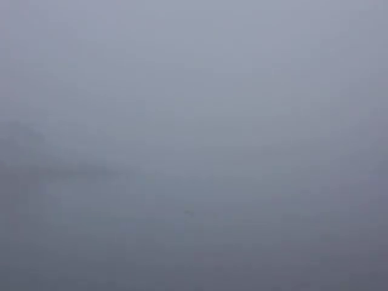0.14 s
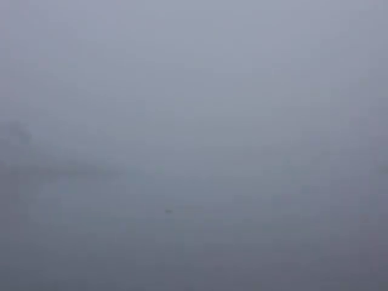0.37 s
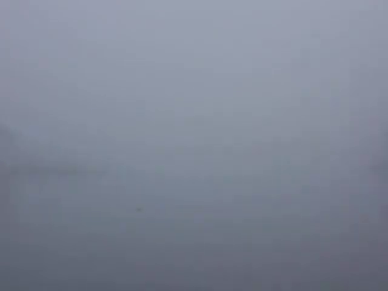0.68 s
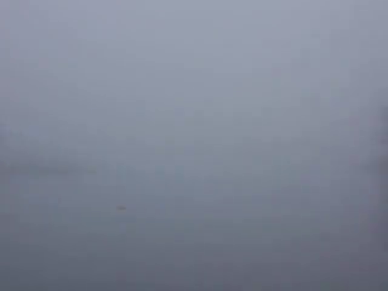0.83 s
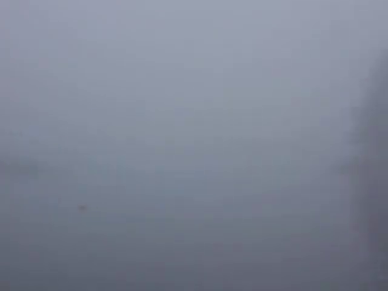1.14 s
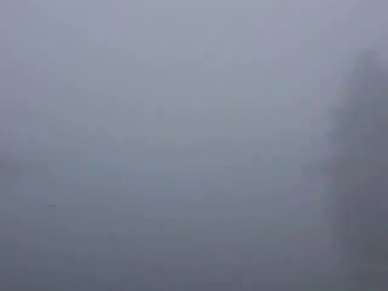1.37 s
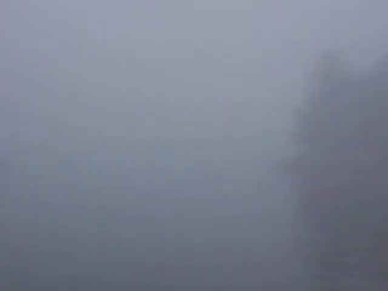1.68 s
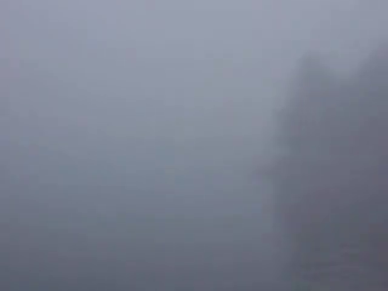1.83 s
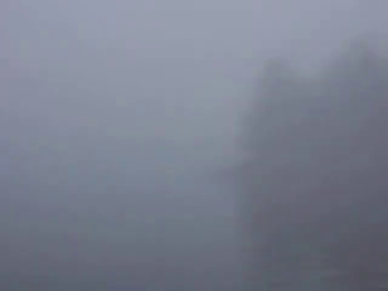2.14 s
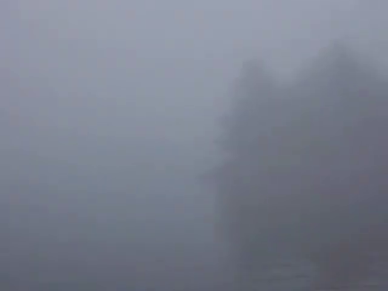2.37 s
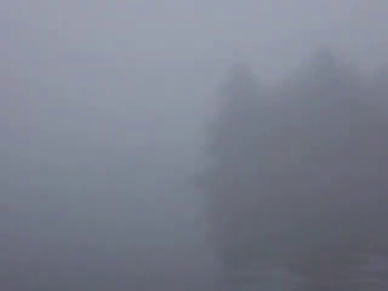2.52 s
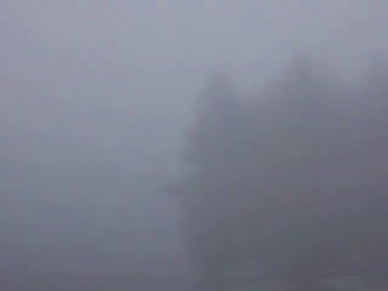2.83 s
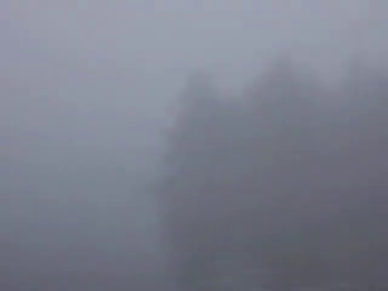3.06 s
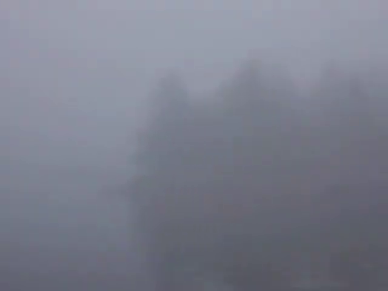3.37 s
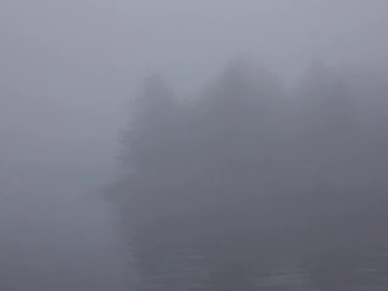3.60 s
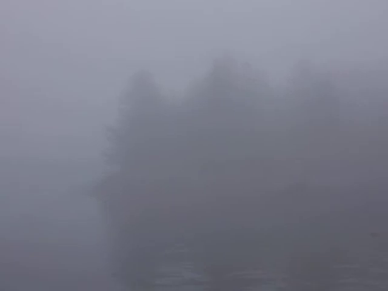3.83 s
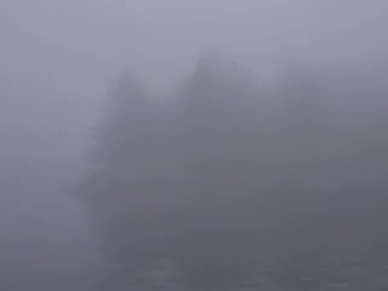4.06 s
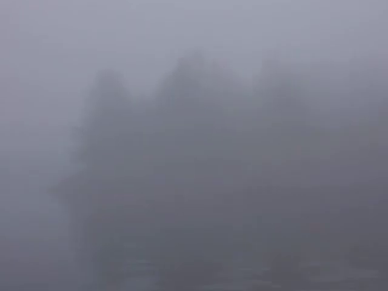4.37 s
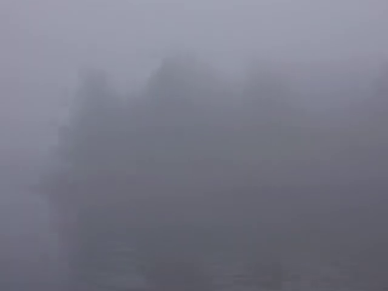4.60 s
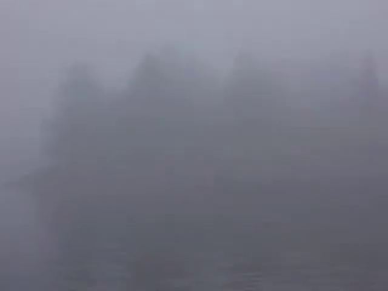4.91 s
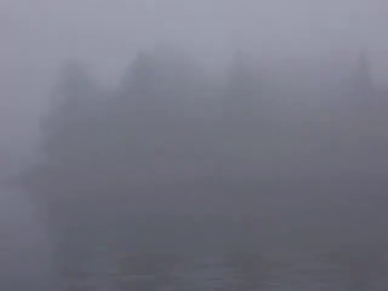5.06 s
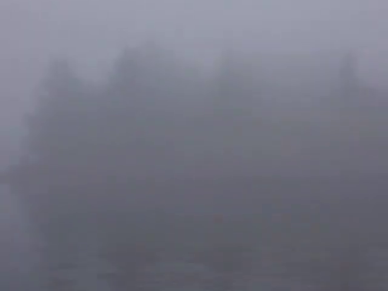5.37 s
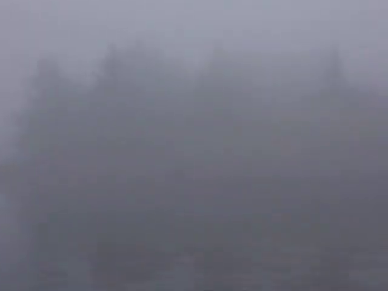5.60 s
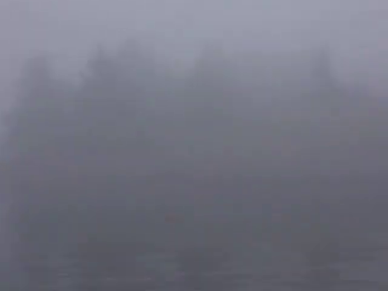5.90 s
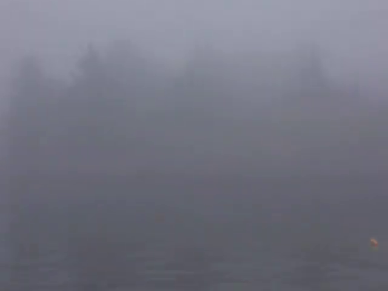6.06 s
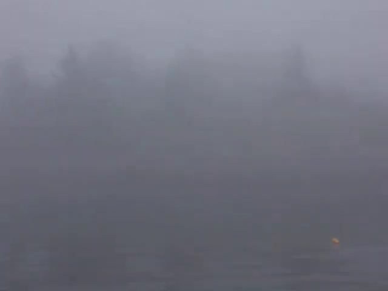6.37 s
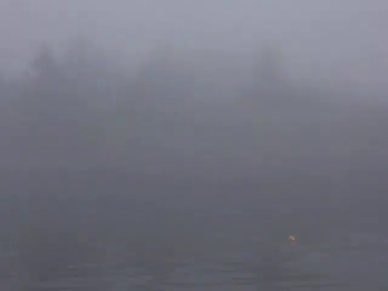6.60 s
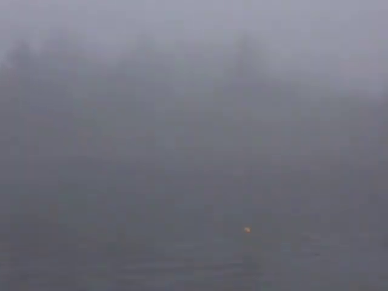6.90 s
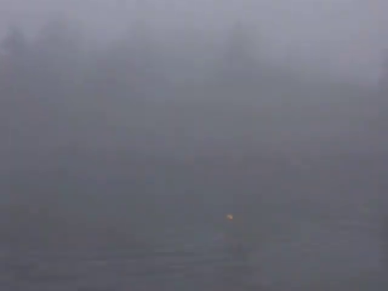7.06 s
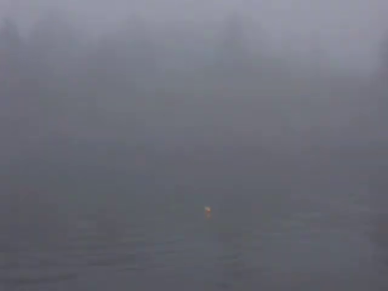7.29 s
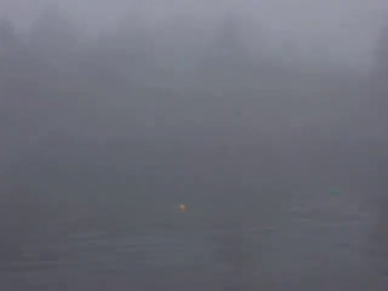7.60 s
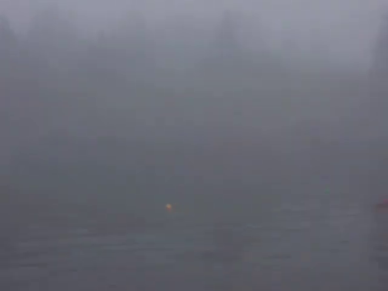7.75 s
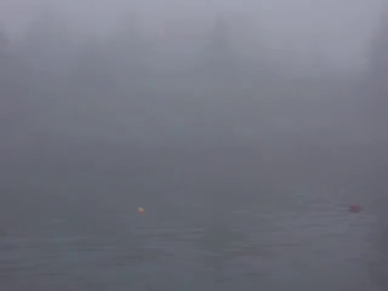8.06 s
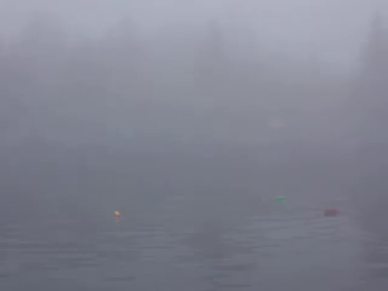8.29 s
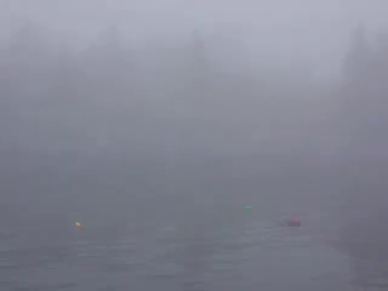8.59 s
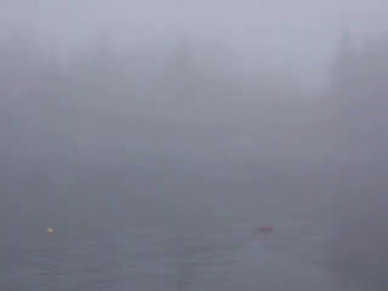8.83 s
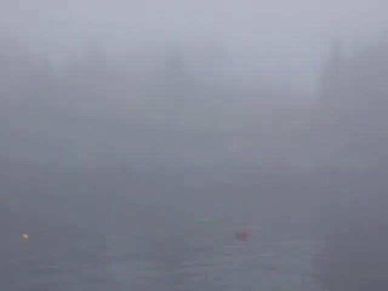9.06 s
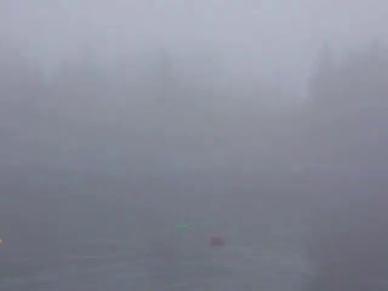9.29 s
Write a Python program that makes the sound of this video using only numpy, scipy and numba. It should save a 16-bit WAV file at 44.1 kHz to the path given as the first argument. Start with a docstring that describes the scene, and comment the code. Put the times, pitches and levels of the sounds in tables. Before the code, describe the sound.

A very close, low ferry horn blares for about a second, stops abruptly, and gives way to steady rumbling engines with faint water slaps.

```python
"""Ferry horn in fog

A ferry creeps through fog; its air horn ends a long blast a few metres from a small camera on deck.
The horn is a stack of pure tones plus air hiss; wavering copies of the tones return from wooded shores.
The camera's gain control then lets the drone rise again: a generator and two main diesels made of
steady tones, exhaust roar and ringing hull plates made of filtered noise, and hiss bursts for water."""
import sys
import numpy as np
from scipy import signal
from scipy.fft import rfft, irfft, next_fast_len
from scipy.io import wavfile
from scipy.ndimage import uniform_filter1d
from numba import njit

SR = 44100
rng = np.random.default_rng(int(sys.argv[2]) if len(sys.argv) > 2 else 0)


def wav_out(sig):
    """Save sig, one row per channel (or a flat mono array), as 16-bit PCM at SR to the path in sys.argv[1]."""
    wavfile.write(sys.argv[1], SR, np.round(np.clip(np.atleast_2d(sig).T, -1, 1) * 32767).astype(np.int16))


N = 416304  # length in samples
T = np.arange(N) / SR  # time in seconds
# All levels below apply before the camera's gain control.
HORN_HZ = 176.84  # pitch of the open horn
GENERATOR_HZ = 29.93  # turns per second


def undb(db):
    """Turn decibels into a plain multiplier."""
    return np.exp(np.asarray(db) * (np.log(10) / 20))


def level(x, db):
    """Scale a sound to a chosen average (rms) level."""
    return x * undb(db) / np.sqrt(np.mean(x ** 2))


def walk(rate, size=N):
    """Smooth random wander with about rate turns a second, spread near 1."""
    draws = rng.standard_normal(int(2 * rate * size / SR) + 5)
    knots = np.convolve(draws, [.5, .7, .5], "valid")
    return np.interp(np.arange(size) * 2 * rate / SR, np.arange(len(knots)), knots)


def band(lo_hz, hi_hz, colour=None):
    """Noise between two edges with sloping sides, shaped by (Hz, dB) points if given."""
    size = next_fast_len(N)
    hz = np.fft.rfftfreq(size, 1 / SR) + 1
    off_centre = np.abs(np.log(hz ** 2 / (lo_hz * hi_hz))) / np.log(hi_hz / lo_hz)
    gain = np.clip(1 - off_centre, 0, 1) ** .5
    if colour is not None:
        colour_hz, colour_db = np.array(colour).T
        gain = gain * undb(np.interp(np.log(hz), np.log(colour_hz), colour_db))
    random_phases = np.exp(2j * np.pi * rng.random(len(hz)))
    return irfft(gain * random_phases, size)[:N]


def causal_phases(db):
    """Phases that make a row of harmonics one sharp puff and its ringing."""
    ceps = irfft(np.log(undb(np.r_[db[0], db, db[-1]])))
    ceps[len(ceps) // 2 + 1:] = 0
    return 2 * rfft(ceps).imag[1:-1]


@njit
def follow(x, attack, release, start):
    """Loudness follower that rises quickly and falls slowly."""
    e, out = start, np.empty(len(x))
    for i in range(len(x)):
        a = abs(x[i])
        e += (a - e) * (attack if a > e else release)
        out[i] = e
    return out


def shape(t, start, end, db, rise, sag, fall):
    """Gain that climbs to db at start, sags until end, then falls away; rates in dB per s."""
    climbing = rise * np.clip(start - t, 0, None)
    sagging = sag * np.clip(t - start, 0, end - start)
    falling = fall * np.clip(t - end, 0, None)
    return undb(db - climbing - sagging - falling)


# Water slapping the side: start_s, level_db (at the start), fall_s (time to fall 60 dB)
SPLASHES = [(2.68, -49.5, 0.03), (4.62, -53, 0.47), (6.12, -48, 0.24), (6.4, -51, 1.16), (6.525, -46, 0.22),
            (6.7, -50.5, 0.3), (7.03, -52, 0.02), (8.9, -50.5, 1.63), (9.12, -53, 0.25)]


def water():
    """Short bursts of spray hiss: each starts at once and dies away, flickering."""
    bursts = 0
    for start_s, level_db, fall_s in SPLASHES:
        bursts = bursts + (T > start_s) * undb(level_db - 60 * np.abs(T - start_s) / fall_s)
    softened = uniform_filter1d(bursts, size=300)
    return softened * level(band(1800, 12000), 0) * undb(3.0 * walk(60))


# Tone colour of the roar, as relative levels: pitch_hz, level_db (per Hz)
ROAR_COLOUR = [(25, -12), (42, -18.5), (60, -11), (100, -10.5), (190, -10), (260, -7.5), (305, -10),
               (480, -8.5), (560, -13.5), (900, -13), (1310, -31.5), (2050, -33), (3050, -44.5),
               (5000, -50.5)]


def roar():
    """Exhaust and machinery noise: bands swell together, flicker alone and throb with the firings."""
    out, swell = 0, walk(9.0)
    throb = np.sin(2 * np.pi * 3 * GENERATOR_HZ * T)  # three generator firings a turn
    for hz in 20 * 2. ** np.arange(.5, 8.1, .5):
        high = min(hz / 1500, 1)  # higher bands swell and throb more
        flicker_db = high * (0.56 * swell + 0.81 * throb) + 0.38 * walk(8)
        out = out + undb(flicker_db) * band(hz / np.sqrt(2), hz * np.sqrt(2), ROAR_COLOUR)
    return level(out, -21.5)


# Plates that ring on the roar: pitch_hz, half_width_hz, level_db (rms)
HULL_PLATES = [(147.1, 35, -33), (230.75, 45, -27), (585.6, 28, -39.5), (668.26, 8.9, -32.5),
               (878.4, 74, -39), (2601, 160, -60), (3697, 210, -61)]


def hull():
    """Ringing steel plates, each a narrow band of noise around its own pitch."""
    return sum(level(band(hz - half, hz + half), db) for hz, half, db in HULL_PLATES)


# A faint whine near 7.85 kHz, then its mirror about 8 kHz made by the camera's sampling:
# pitch_hz, level_db (peak, before the throb)
WHINE_AND_MIRROR = [(7851, -70), (8148, -69)]


def whine_and_mirror():
    """A faint whine and its mirror from the camera's sampling; both throb once a generator turn."""
    tones = sum(undb(db) * np.sin(2 * np.pi * hz * T) for hz, db in WHINE_AND_MIRROR)
    return tones * (1 + np.sin(2 * np.pi * GENERATOR_HZ * T))


def engine(hz, orders, unsteady, waver_db, start_turns=0, count=8):
    """Multiples of one turning rate that drifts a little; each multiple wavers in level."""
    # made at 1 / count of the sample rate, so walk rates are multiplied by count
    size = N // count + 1
    speed = hz * (1 + unsteady * walk(.5 * count, size=size))
    turn = 2 * np.pi * np.cumsum(speed) * count / SR
    loudest = max(orders, key=lambda row: row[1])[0]
    slow = 0
    for multiple, db in orders:
        gain = np.sqrt(2) * undb(db + waver_db * walk(3.0 * count, size=size))
        # the loudest starts at start_turns, the others anywhere
        offset = start_turns if multiple == loudest else rng.random()
        slow = slow + gain * np.sin(int(multiple) * turn + 2 * np.pi * offset)
    return signal.resample_poly(slow, count, 1)[:N]


# Generator tones: multiple (of its turning rate), level_db (rms)
GENERATOR_TONES = [(1, -40), (2, -34), (3, -49), (4, -40), (5, -33), (6, -23), (8, -29), (9, -25.5),
                   (12, -42), (13, -40), (19, -40.5), (21, -35.5), (24, -38), (25, -41.5), (27, -37),
                   (30, -45.5), (31, -41), (32, -42.5), (35, -46), (36, -50.5), (37, -50.5), (39, -61.5),
                   (40, -63.5), (41, -63), (42, -60.5), (44, -59.5), (47, -55.5), (49, -54.5), (56, -67.5),
                   (59, -57), (62, -57), (65, -63), (66, -55), (67, -67.5), (70, -55), (72, -64.5),
                   (73, -68.5), (87, -67.5)]


def generator():
    """A fast, steady engine: tones at multiples of its turning rate."""
    # the start, in turns, sets when its hum and the horn's lowest partial throb together
    return engine(GENERATOR_HZ, GENERATOR_TONES, 0.0002013, 1.2, start_turns=0.34)


# Port diesel tones: multiple (of 8.857 Hz), level_db (rms)
PORT_TONES = [(5, -47.5), (13, -37.5), (14, -42), (16, -32), (18, -41.5), (19, -46.5), (28, -33), (47, -45),
              (52, -40.5), (56, -31.5), (58, -50), (60, -37), (72, -40), (76, -36.5), (80, -41), (94, -55),
              (97, -44), (100, -39.5), (110, -47)]


def port_diesel():
    """The first main engine: tones at multiples of its slow cycle."""
    return engine(8.857, PORT_TONES, 0.000515, 2.0)


# Starboard diesel tones: multiple (of 8.775 Hz), level_db (rms, relative to the hum level)
STARBOARD_TONES = [(6, -18), (8, 1.5), (10, -12), (16, -8.5), (24, -3.5), (38, -13), (42, -20.5), (56, -9)]
HUM_DB, HUM_FULL_S, HUM_RISE_DB_S = -28.5, 3.2, 2.5  # the hum grows at first
BEAT_HZ, BEAT_PEAK_S, BEAT_DEPTH = .77, 7.36, 0.33


def starboard_diesel():
    """The second main engine; its hum swells regularly, as diesels drifting in and out of step do."""
    hum = undb(HUM_DB - HUM_RISE_DB_S * np.clip(HUM_FULL_S - T, 0, None))
    beat = 1 + BEAT_DEPTH * np.cos(2 * np.pi * BEAT_HZ * (T - BEAT_PEAK_S))
    return hum * beat * engine(8.775, STARBOARD_TONES, 0.0010247, 0.99)


# The blast returning: start_s, end_s, level_db (of the 20th multiple, before it wavers), sag_db_per_s
SHORE_ECHOES = [(0, 1.2, -60, 5.5), (1.3, 1.68, -50.5, 31), (1.93, 2.6, -59, 40)]
SHORE_RISE_DB_S, SHORE_FALL_DB_S = 199.5, 170.5
SHORE_TILT_DB = -4.5  # per octave


def shores(size=120000):
    """Many trees at many distances: each partial returns with its own restless size and phase."""
    t = T[:size]
    echo = 0
    for multiple in range(8, 44):
        gain = undb(SHORE_TILT_DB * np.log2(multiple / 20)) * walk(70, size=size)
        echo = echo + gain * np.cos(2 * np.pi * (multiple * HORN_HZ * t + rng.random()))
    loudness = sum(shape(t, start_s, end_s, level_db, SHORE_RISE_DB_S, sag, SHORE_FALL_DB_S)
                   for start_s, end_s, level_db, sag in SHORE_ECHOES)
    return np.pad(loudness * echo, (0, N - size))


SHUT_S = 1.185  # the valve shuts
LIFT_HZ, LIFT_S = 2.7, .012  # the pitch jumps as the pressure drops

# Open horn: multiple (of the horn pitch), level_db (peak, before the rasp and waver)
OPEN_TONES = [(1, -5), (2, -3), (3, 1), (4, -6.5), (5, -12.5), (6, -30), (7, -22.5), (8, -19.5), (9, -20),
              (10, -30), (11, -21.5), (12, -27.5), (13, -28.5), (14, -29), (15, -38.5), (16, -30.5),
              (17, -33), (18, -39.5), (19, -35), (20, -34.5), (21, -37.5), (22, -37.5), (23, -34.5),
              (24, -43.5), (25, -34), (26, -44.5), (27, -38), (28, -41.5), (29, -50), (30, -37), (31, -42),
              (32, -30.5), (33, -36), (34, -52.5), (35, -35.5), (36, -41), (37, -35), (38, -46), (39, -50),
              (40, -43.5), (41, -57.5), (42, -44.5), (43, -51.5), (44, -54.5), (45, -64)]
# Changing level of the horn's treble: time_s, low_db (around 4.3 kHz), high_db (around 6 kHz)
RASP_LEVELS = [(0, 2.5, -4.5), (.19, 0.5, -6), (.27, 1.5, -0.5), (.47, 4.5, 1), (.6, 1.5, -2.5),
               (1.2, 1, -2)]
RASP_WAVER_DB = .055  # per multiple: moving air makes the high partials waver more


def open_horn(t, turn):
    """The diaphragm chops compressed air into puffs; also returns each partial's starting phase."""
    time_s, low_points, high_points = np.transpose(RASP_LEVELS)
    low_db, high_db = np.interp(t, time_s, low_points), np.interp(t, time_s, high_points)
    multiples, levels_db = np.transpose(OPEN_TONES)
    # within each cycle the higher partials arrive later: every puff sweeps upward
    lag = causal_phases(levels_db) - .15 * multiples ** 2
    # nearby steel scatters the treble
    lag = lag + np.clip((multiples - 12) / 6, 0, 1.5) * rng.standard_normal(len(multiples))
    steady = 0
    for m, db, phase in zip(multiples, levels_db, lag):
        rasp_db = low_db * np.exp(-((m - 24) / 4) ** 2) + high_db * np.exp(-((m - 33) / 6) ** 2)
        waver_db = RASP_WAVER_DB * m * walk(2.5, size=len(t))
        steady = steady + undb(db + rasp_db + waver_db) * np.cos(m * turn + phase)
    return steady, lag


# Closing horn: multiple (of the lifted pitch), level_db (peak, before dulling and break-up)
CLOSING_TONES = [(1, -19), (2, -7), (3, -0.5), (4, -13), (5, -29.5), (6, -13.5), (7, -26), (8, -30),
                 (9, -34.5), (10, -23), (11, -30), (12, -26), (13, -35), (14, -31.5), (15, -37), (16, -35),
                 (17, -42), (18, -34.5), (19, -47.5), (20, -39), (21, -38.5), (22, -32), (23, -37.5),
                 (24, -39.5), (25, -34.5), (26, -37), (27, -39.5), (28, -38), (29, -50.5), (30, -40),
                 (31, -37.5), (32, -40.5), (33, -51.5), (34, -32), (35, -42), (36, -36), (37, -42),
                 (38, -41), (39, -45.5), (40, -37)]
CLOSING_DULL_DB_S = 4  # per multiple: the high partials die first


def closing_horn(t, turn, lag):
    """The tone on the last air: the pitch lifts and the high partials break up most."""
    since_lift = np.clip(t - SHUT_S + LIFT_S, 0, None)
    lift = LIFT_HZ * (1 - np.exp(-since_lift / LIFT_S))
    lifted = turn + 2 * np.pi * np.cumsum(lift) / SR
    skip = SR  # the first second is left silent
    since_shut = np.clip(t - SHUT_S, 0, None)[skip:]
    closing = 0
    for (m, db), phase in zip(CLOSING_TONES, lag):
        break_up = 1 + min(m / 20, .8) * walk(34.9, size=len(t) - skip)
        gain = undb(db - CLOSING_DULL_DB_S * m * since_shut) * break_up
        closing = closing + gain * np.cos(m * lifted[skip:] + phase)
    return np.pad(closing, (skip, 0))


# Horn ringing back: multiple (of the horn pitch), level_db (relative to the ring's own level)
RING_TONES = [(1, -9.5), (2, 2), (3, -3.5), (4, 3.5), (5, -10), (6, -28.5), (7, -33.5), (8, -34.5),
              (9, -26), (10, -27)]


def deckhouse_ring(t):
    """The open tone ringing back off the deckhouse, each partial flickering in level."""
    return sum(undb(db + 3.0 * walk(22, size=len(t)))
               * np.cos(2 * np.pi * (m * HORN_HZ * t + rng.random())) for m, db in RING_TONES)


def horn(size=68000):
    """Open blast, lingering treble, closing tone and ring, joined where the valve shuts."""
    t = T[:size]
    turn = 2 * np.pi * HORN_HZ * t
    steady, lag = open_horn(t, turn)
    closing = closing_horn(t, turn, lag)
    ring = deckhouse_ring(t)
    # escaping air hisses, harder while the diaphragm is open in each cycle
    hiss = level(band(900, 5000), -40) + level(band(3000, 9000), -47.5)
    air = (1 + .5 * np.cos(turn)) * hiss[:size]
    blast = steady + air
    # the open tone's treble lingers between the steel walls nearby
    treble = signal.sosfilt(signal.butter(4, 1150, "high", fs=SR, output="sos"), blast)

    # the tank pressure sinks, then the open tone is cut
    open_gain = shape(t, 0, SHUT_S, db=0, rise=0, sag=4, fall=1000)
    linger_gain = shape(t, SHUT_S, SHUT_S + .09, db=-9, rise=1000, sag=60, fall=1000)
    taken, late = SHUT_S + LIFT_S, SHUT_S + .125  # closing tone and ring reach their peaks
    closing_gain = shape(t, taken, taken + .095, db=-5.5, rise=900, sag=40, fall=501)
    ring_gain = shape(t, late, late + .08, db=-22.5, rise=451, sag=20, fall=170)
    sound = open_gain * blast + linger_gain * treble + closing_gain * (closing + air) + ring_gain * ring
    return np.pad(sound, (0, N - size))


def scene():
    """Add up all the layers."""
    drone = generator() + port_diesel() + starboard_diesel()
    machinery_noise = roar() + hull()
    return (water() + machinery_noise + whine_and_mirror() + drone + shores() + horn())[None]


def record(dry):
    """Gain control holds the level, loud swings carry a gritty hiss, the top rolls off and is cut."""
    x = dry[0]
    start = np.abs(x[:2000]).mean() * 2.03
    heard = follow(x, 1 / (0.00693 * SR), 1 / (.08 * SR), start)
    # a second stage makes the gain slow to let go
    heard = follow(heard, 1 / (0.007 * SR), 1 / (.06 * SR), heard[0])
    x = x * undb(-12.5) / heard
    swing = uniform_filter1d(x ** 2, size=300) ** .5
    x = x + undb(-35.5) * swing * level(band(2900, 20000), 0)
    rounded = np.tanh(.4 * x) / .4  # peaks are softly squashed
    x = np.convolve(rounded, signal.firwin(65, 8000, window=("kaiser", 6), fs=SR), "same")
    x = x * np.clip(np.minimum(T, T[::-1]) / .003, 0, 1)  # no click at either end
    return signal.sosfilt(signal.ellip(8, .2, 40, 8900, fs=SR, output="sos"), x)[None]


dry = scene()
out = record(dry)
wav_out(out)
```